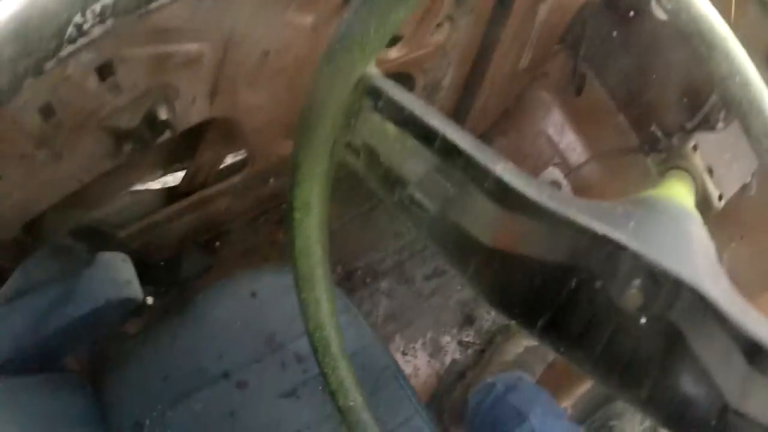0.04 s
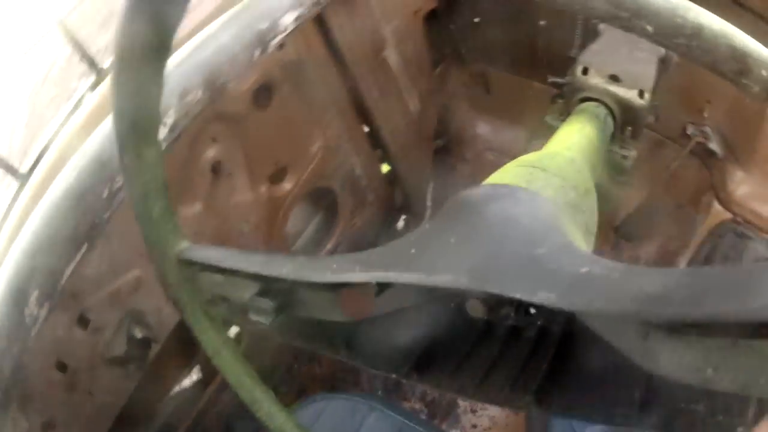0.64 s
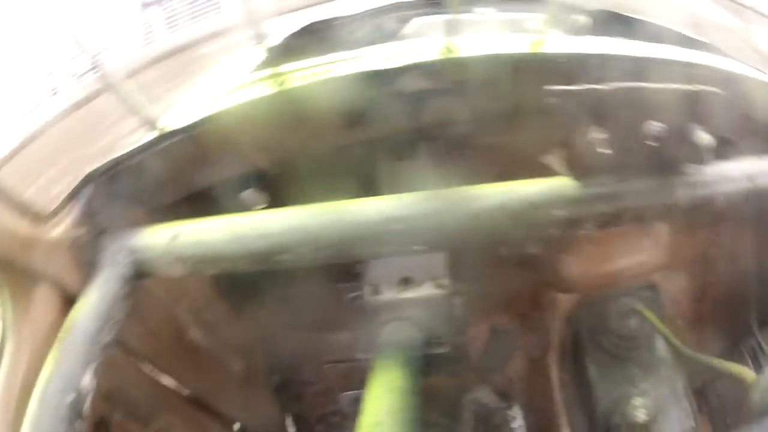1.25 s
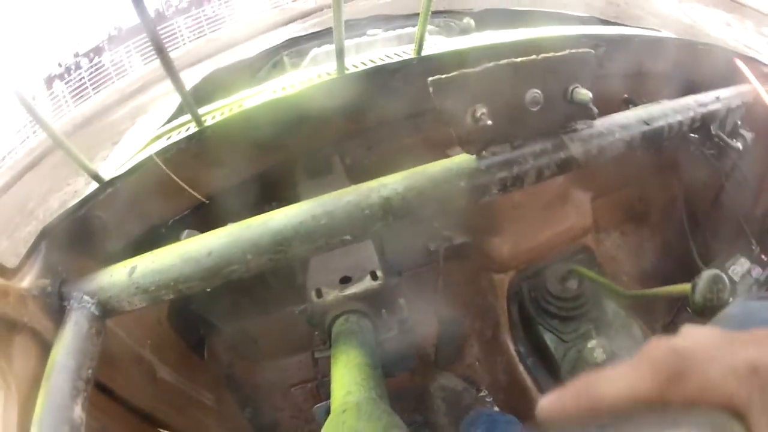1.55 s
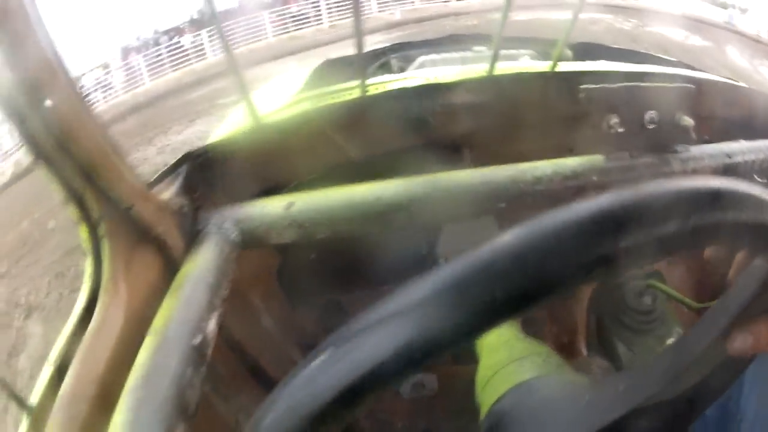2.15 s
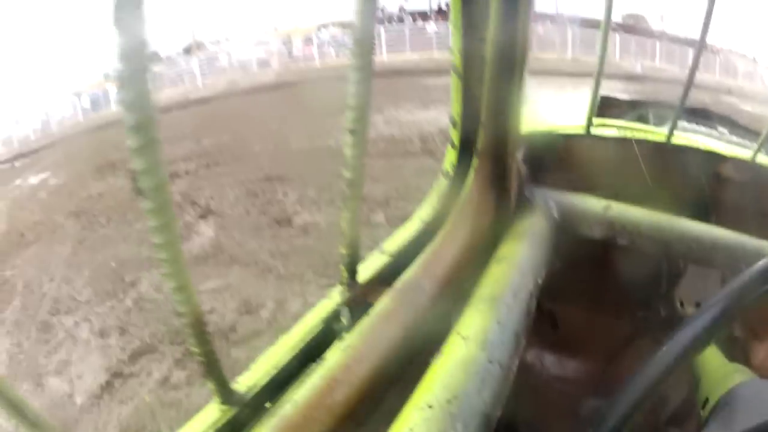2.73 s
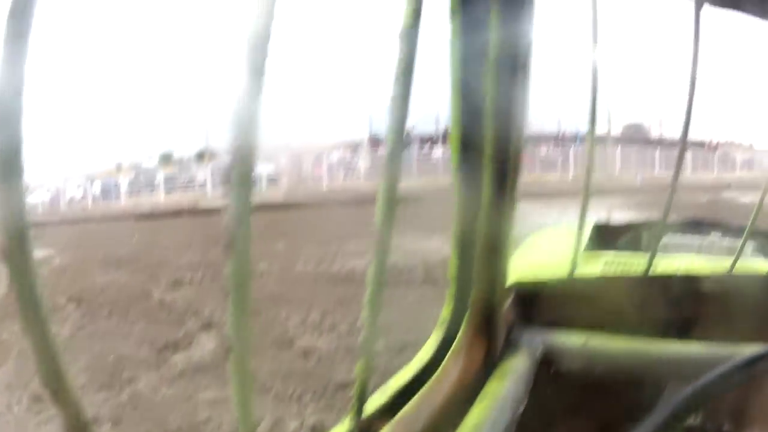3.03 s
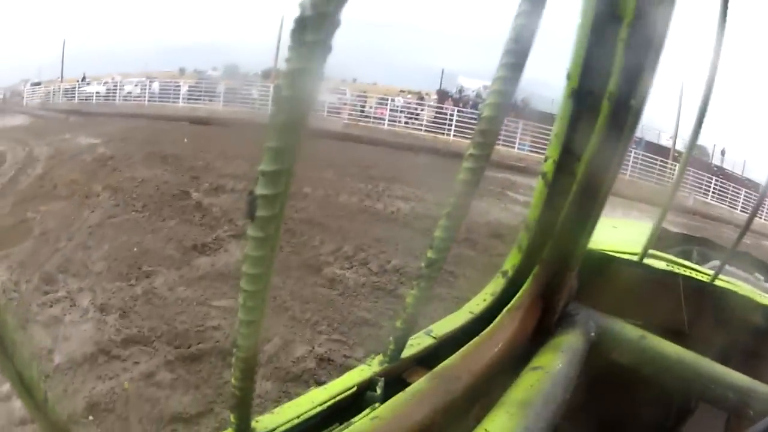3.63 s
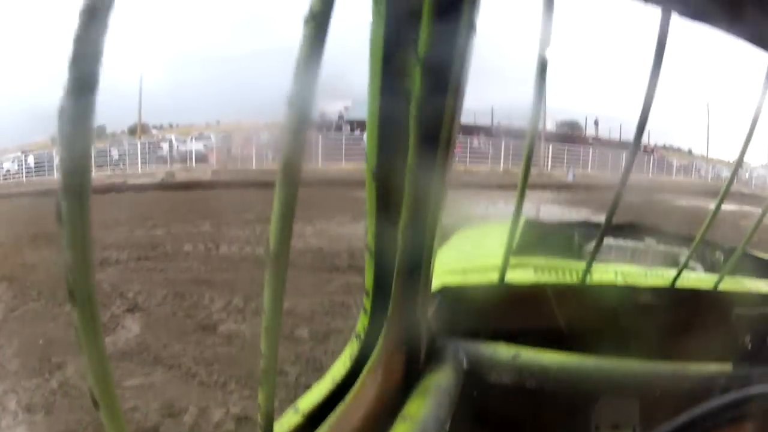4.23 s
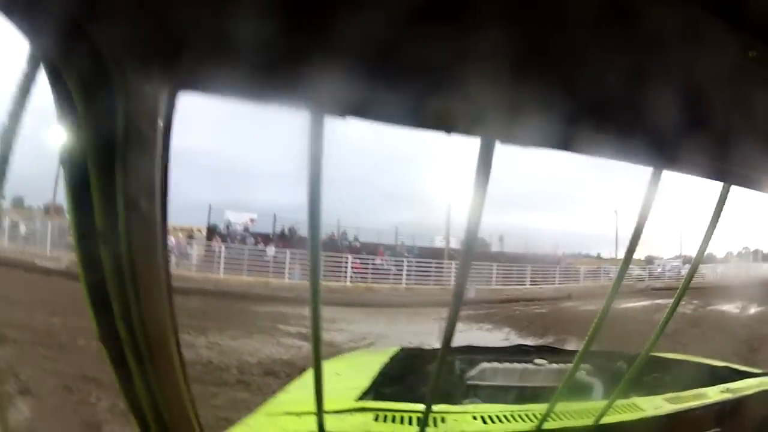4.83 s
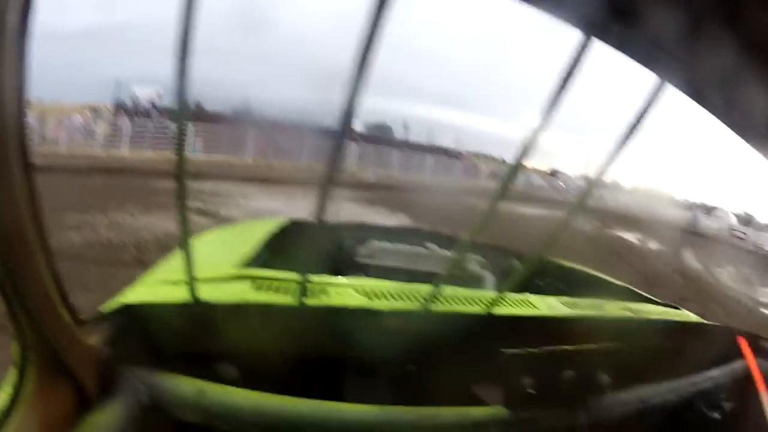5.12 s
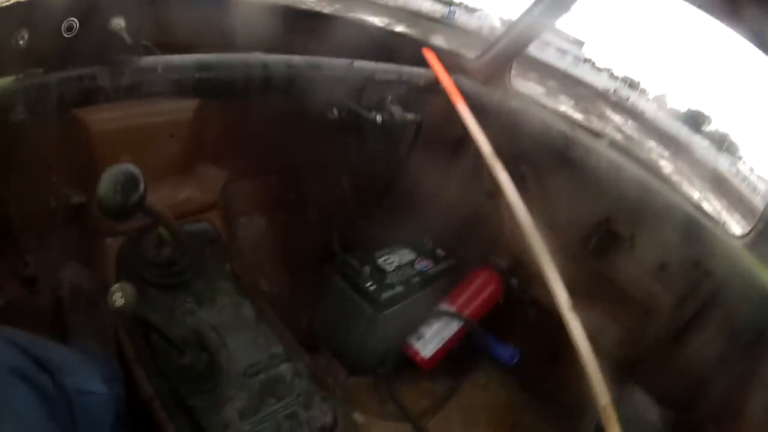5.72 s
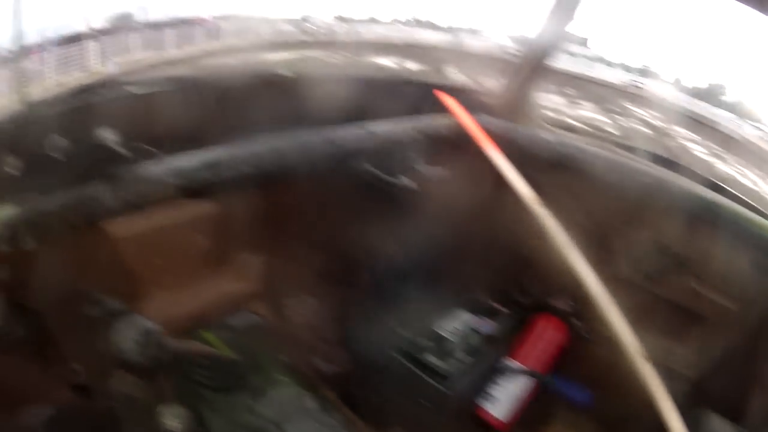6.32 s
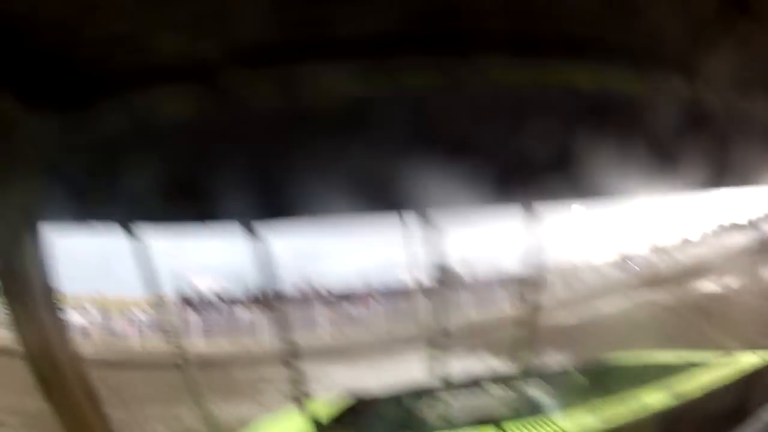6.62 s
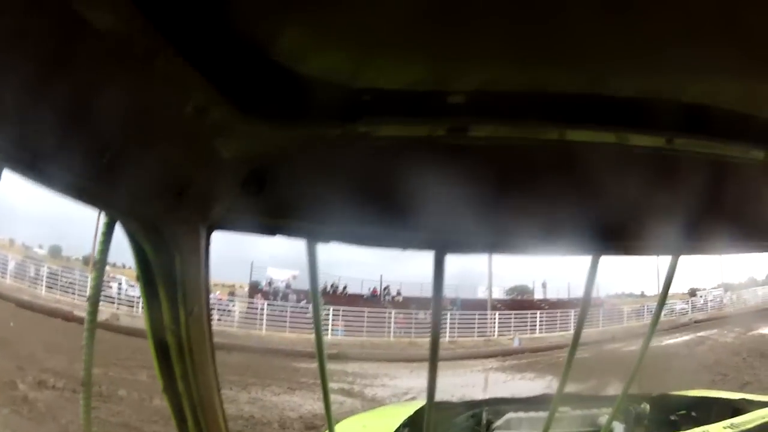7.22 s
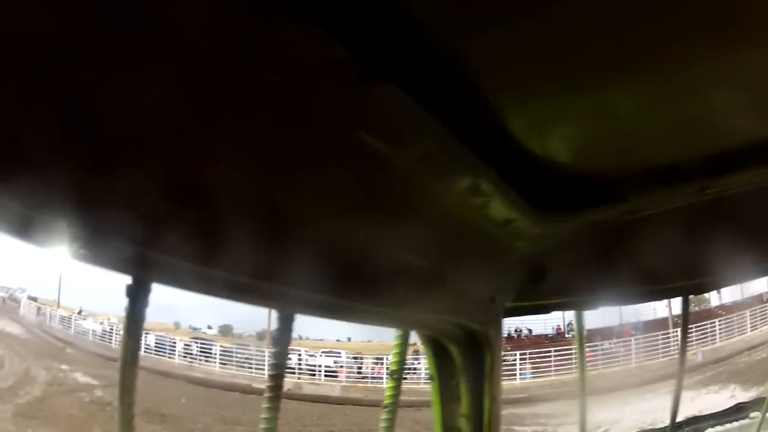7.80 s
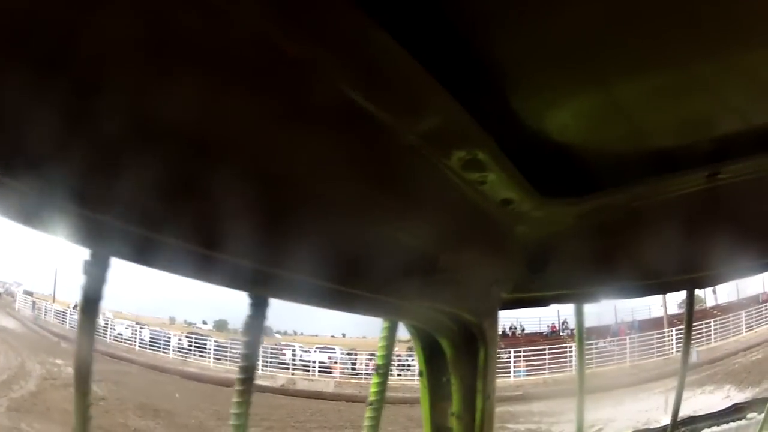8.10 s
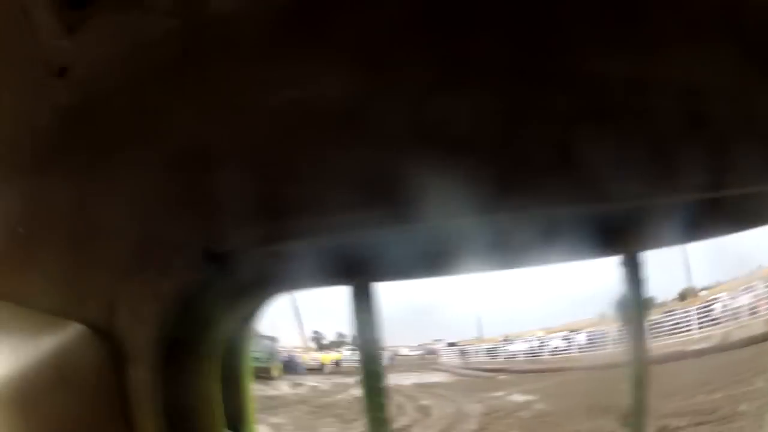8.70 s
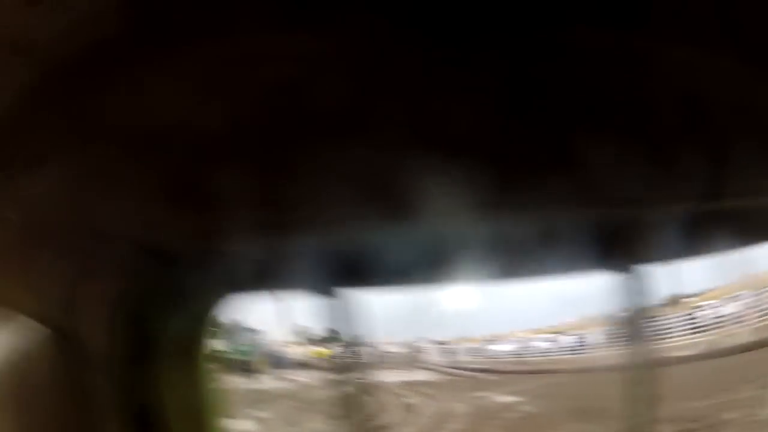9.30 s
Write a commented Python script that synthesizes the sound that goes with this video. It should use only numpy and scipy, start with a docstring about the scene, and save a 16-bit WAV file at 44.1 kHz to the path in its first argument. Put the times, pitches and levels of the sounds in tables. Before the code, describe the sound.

Inside a stripped truck cab in an outdoor arena, an engine idles faintly under low rumble and even hiss. A worn camera case hits the cab with a loud, sharp knock, followed by soft bumps, clothing scuffs and a brief strap creak. Later it knocks again with a deep boom and scrapes along the roof in short juddering bursts as the idle fades. A small buckle clinks near the end. Everything sounds boxy through the case.

```python
"""Stripped cab of a derby truck on a muddy arena, heard by a cased camera that the driver wears.
An engine idles some way off, under arena rumble and hiss. At 0.7 s the case knocks against the cab,
overloading; clothing scuffs as he turns. From 6.2 s the idle fades and a farther drone comes through.
At 6.8 s the case knocks again with a deep boom, then grinds along the roof. A buckle chafes at 9.1 s.
The camera samples coarsely, so its treble is a faint mirror image of the sound below."""
import sys
import numpy as np
from scipy import signal
from scipy.fft import rfft, irfft, next_fast_len
from scipy.io import wavfile
from scipy.ndimage import map_coordinates

SR = 44100
rng = np.random.default_rng(int(sys.argv[2]) if len(sys.argv) > 2 else 0)


def master(y):
    """Save y as 16-bit WAV."""
    cut = np.clip(np.atleast_2d(y).T, -1, 1)
    pcm = np.round(cut * 32767)  # scale
    wavfile.write(sys.argv[1], SR, pcm.astype(np.int16))


N = 412335

# rumble of arena and body sway: (frequency [Hz], density [dB])
RUMBLE_SPECTRUM = [(12, -23), (22, -8), (34, 5), (48, -21.5), (80, -13), (140, -15), (200, -15.5),
                   (300, -21.5), (450, -25), (700, -38.5), (1500, -63)]


def knocks():
    """The case strikes the cab, twice hard, otherwise softly."""
    # (time [s], shell [dB], contact cut-off [Hz], cab boom [dB], crack [dB])
    strikes = [(0.7118, 6.5, 5800, -36, -14), (1.801, -63, 150, -33.5, -70), (2.389, -21, 147, -25, -68),
               (3.132, -29, 150, -30.5, -69), (6.733, -31, 300, -24.5, -48), (6.76, -30.5, 300, -24.5, -48),
               (6.789, 3.5, 155, -4.5, -18.5), (6.981, -16, 150, -19, -56), (6.994, -42, 400, -47, -47),
               (7.035, -45, 150, -19.5, -67), (7.488, -37, 200, -26, -56)]
    out = np.zeros(N)
    for s, *strike in strikes:
        add(out, s, blow(*strike))
    return out


def blow(shell_db, cut_hz, boom_db, crack_db):
    """A blow cracks, rings the shell and booms the cab; soft contact builds slowly, missing high modes."""
    # case and mount: (frequency [Hz], level [dB], t60 [s])
    modes = [(84, -27, 0.31), (117.9, -14, 0.16), (201.4, 16, 0.0149), (213, -15.5, 0.032),
             (259.4, -19, 0.1), (331, 27.5, 0.00631), (406, -30, 0.072), (547.6, 27.5, 0.0046),
             (788, -40, 0.0184), (2208, -3, 0.015)]
    boom_hz, boom_t60_s, boom_attack_s = 47.3, 0.22, 0.0018
    choke_s, crack_peak_s = 0.061, 0.0021
    t = np.arange(SR // 2) / SR
    ring = sum(amp(db - 60 * t / t60) * np.sin(2 * np.pi * hz * t) / np.hypot(1, (hz / cut_hz) ** 2)
               for hz, db, t60 in modes)
    choke = np.exp(-(t / choke_s) ** 6)  # the case stays pressed on
    shell = ring * (1 - np.exp(-1.5 * t * cut_hz)) ** 2 * choke
    boom = amp(-60 * t / boom_t60_s) * np.sin(2 * np.pi * boom_hz * t)
    boom *= (1 - np.exp(-t / boom_attack_s)) ** 2
    burst = lambda u: (np.maximum(u, 0) * np.exp(1 - np.maximum(u, 0))) ** 1.1
    rebounds_s = np.cumsum(0.015 * 0.6 ** np.arange(3))
    chatter = sum(amp(-22.5 - 6 * k) * burst((t - s) / crack_peak_s) for k, s in enumerate(rebounds_s))
    crack = (burst(t / crack_peak_s) + chatter) * grains(contact_db, len(t))
    return amp(shell_db) * shell - amp(boom_db) * boom + amp(crack_db) * crack


def grinding():
    """The case lands softly, drags over gritty steel and judders on its mount."""
    # (start [s], length [s], grit [dB], judder [dB], landing [dB])
    drags = [(2.229, 0.028, -31, -56, -54), (6.866, 0.098, -29.5, -25.5, -35),
             (7.114, 0.065, -40, -34.5, -38), (7.185, 0.069, -48.5, -41.5, -48),
             (7.32, 0.046, -42, -37.5, -38), (7.424, 0.044, -38.5, -30, -47),
             (7.592, 0.04, -48, -36, -36.5)]
    # mount judder: (frequency [Hz], density [dB])
    judder_spectrum = [(20, 4), (45, 7.5), (110, 1), (160, -2.5), (220, 6), (330, -13.5), (435, -11.5),
                       (560, -28), (800, -40)]
    judder = lambda hz: along(judder_spectrum, hz)
    out = np.zeros(N)
    for s, length_s, grit_db, judder_db, landing_db in drags:
        add(out, s, amp(landing_db) * blow(shell_db=5, cut_hz=270, boom_db=8.5, crack_db=-2.5))
        mid_s, spread_s = s + length_s / 2, 0.35 * length_s
        add_stroke(out, mid_s, spread_s, spread_s, grit_db, contact_db, clump_db=0.9, square=4.35)
        add_stroke(out, mid_s, 0.73 * spread_s, 1.25 * spread_s, judder_db, judder,
                   clump_db=1.3, square=1.7)
    return out


def clothing():
    """Cloth slides, a taut strap rasps in a few resonances, body sway rumbles with each move."""
    # (peak [s], rise [s], fall [s], level [dB], tilt [dB/octave])
    scuffs = [(0.352, 0.0018, 0.0076, -41, 5), (0.397, 0.014, 0.015, -42, 2),
              (0.505, 0.041, 0.019, -36.5, -1.5), (0.828, 0.023, 0.047, -36.5, -2),
              (1.462, 0.0017, 0.012, -42, -0.5), (1.499, 0.0034, 0.016, -44, -1),
              (2.234, 0.015, 0.017, -37, 0.5), (2.524, 0.0025, 0.017, -42, -1),
              (3.32, 0.034, 0.039, -55, 1.5), (4.881, 0.076, 0.058, -51.5, 0),
              (5.2, 0.0091, 0.037, -38.5, 2.2), (5.301, 0.0025, 0.0086, -35.5, -5),
              (5.587, 0.0077, 0.015, -39, -4), (5.994, 0.0077, 0.019, -48, 0), (8.32, 0.032, 0.033, -57, 0),
              (8.787, 0.0077, 0.018, -51.5, 0)]
    # cloth relative to open hiss: (frequency [Hz], gain [dB])
    cloth_eq = [(250, 3.5), (520, -7.5), (800, 6), (1050, -0.5), (1400, -1), (2300, 1.5), (3600, 7),
                (5600, 7.5)]
    # strap over a hollow edge: (peak [s], rise [s], fall [s], level [dB])
    creaks = [(5.45, 0.03, 0.034, -42), (5.515, 0.029, 0.04, -39.5), (5.993, 0.009, 0.023, -45)]
    # (centre [Hz], half-width [Hz], level [dB])
    strap_modes = [(1320, 220, 0.5), (2050, 69, 5.5), (2530, 230, -1.5), (3470, 300, -15.5)]
    sway_s, sway_db = 0.1, -12
    out = np.zeros(N)
    for s, rise_s, fall_s, db, tilt in scuffs:
        cloth = lambda hz: airborne_db(hz) + along(cloth_eq, hz) + tilt * np.log2(np.clip(hz, 300, 6000))
        add_stroke(out, s, rise_s, fall_s, db, cloth, clump_db=2.0, square=1.42)
    strap = lambda hz: 20 * np.log10(sum(amp(db) / (1 + ((hz - centre) / width) ** 2)
                                         for centre, width, db in strap_modes))
    for s, rise_s, fall_s, db in creaks:
        add_stroke(out, s, rise_s, fall_s, db, strap, clump_db=1.5, square=2.3)
    for s, _, _, db, *_ in scuffs + creaks:
        add_stroke(out, s, sway_s, sway_s, db + sway_db, rumble_db, clump_db=-0.5, square=2.0)
    return out


def taps():
    """The mount shifts in its play: a click and a short hollow note."""
    # (time [s], note [dB], click [dB])
    shifts = [(0.061, -34.5, -56), (2.917, -33.5, -46.5), (2.986, -37.5, -38), (5.101, -35, -54),
              (5.227, -33.5, -53), (5.574, -46, -47), (8.431, -46, -59), (9.069, -42.5, -66),
              (9.281, -34.5, -50.5)]
    note_hz, note_t60_s, click_t60_s = 265, 0.045, 0.039
    out, t = np.zeros(N), np.arange(SR // 5) / SR
    for s, note_db, click_db in shifts:
        note_env = amp(note_db + 4.5 - 60 * t / note_t60_s) * (1 - np.exp(-t / 0.0023))
        click_env = amp(click_db - 60 * t / click_t60_s) * (1 - np.exp(-t / 0.00035))
        add(out, s, note_env * np.sin(2 * np.pi * note_hz * t) + click_env * grains(contact_db, len(t)))
    return out


def buckle():
    """Steel chafes on steel and rattles the buckle's damped modes, differently at each touch."""
    # (peak [s], rise [s], fall [s], level [dB])
    touches = [(9.081, 0.0027, 0.0043, -54.5), (9.105, 0.004, 0.0069, -50.5),
               (9.271, 0.0045, 0.0077, -45.5), (9.301, 0.0052, 0.018, -43.5)]
    # (frequency [Hz], level [dB], t60 [s])
    modes = [(2460, 0.5, 0.026), (2750, -7, 0.024), (3130, -10, 0.027), (3710, -6.5, 0.052),
             (4000, -6, 0.028), (4730, -11.5, 0.043), (5080, -2.5, 0.024)]
    lead_s = 0.25
    out, t = np.zeros(N), np.arange(SR // 5) / SR
    for s, rise_s, fall_s, db in touches:
        chafe = np.zeros(SR // 2)
        add_stroke(chafe, lead_s, rise_s, fall_s, db, np.zeros_like, clump_db=3, square=2)
        ring = sum(amp(mode_db + rng.normal(0, 2.7) - 60 * t / t60)
                   * np.sin(2 * np.pi * (hz * rng.normal(1, 0.014) * t + rng.random()))
                   for hz, mode_db, t60 in modes)
        rattle = signal.fftconvolve(chafe, ring / np.linalg.norm(ring))[:len(chafe)]
        grit = signal.lfilter(*signal.butter(2, [2200, 9000], "band", fs=SR), chafe)
        add(out, s - lead_s, amp(0.5) * rattle + amp(1.4) * grit)
    return out


def rustle():
    """Jacket fibres catch and tick in flurries, fainter once the driver sits still."""
    catches = (rng.random(N) < 60 * amp(4 * wobble(3)) / SR) * rng.uniform(0.46, 1, N)  # about 60 /s
    t = np.arange(SR // 50) / SR
    ticks = signal.fftconvolve(catches, rng.standard_normal(len(t)) * amp(-60 * t / 0.074))[:N]
    stir_db = np.interp(clock(), [6.5, 7.7], [-64, -72])
    fibre = lambda hz: airborne_db(hz) + 2.2 * np.log2(np.clip(hz, 300, 5000))
    return amp(stir_db) * unit(coloured(ticks, fibre))


def engines():
    """A six-cylinder idle, three firings a turn, fades as a farther drone comes through."""
    # (time [s], firing rate [Hz])
    firing_rate = [(0, 168.6), (1.3, 170), (2.4, 165.8), (3.8, 170.8), (5, 169.6), (6.3, 171.9)]
    # idle throb: (crankshaft order, level [dB])
    throb_orders = [(1, 1), (2, -16.5), (4, -23), (7, -43)]
    # firing note: (crankshaft order, level [dB])
    note_orders = [(3, -1.5), (6, -13), (9, -14.5)]
    turns = np.cumsum(curve(firing_rate) * (1 + 0.0036 * wobble(11))) / SR / 3
    early = np.interp(clock(), [0, 3.4], [1, 0])
    throb_db = -52.5 + 2.5 * early - 20 * fade()
    note_db = -53 - 7 * early - 12 * fade()
    idle = np.zeros(N)
    for orders, level_db in (throb_orders, throb_db), (note_orders, note_db):
        for order, db in orders:
            gain = amp(level_db + db + 2.4 * wobble(9.8))
            idle += gain * np.sin(2 * np.pi * (order * turns + rng.random()))
    drone_db = -77 + 17 * fade() + 1.42 * wobble(14)
    drone_hz = 73.3 * (1 + 0.0119 * wobble(1.6))
    drone = amp(drone_db) * np.sin(2 * np.pi * np.cumsum(drone_hz) / SR)
    return np.sqrt(2) * (idle + drone)


def arena():
    """Low rumble and even hiss fill the open cab."""
    # (time [s], level [dB])
    hiss_level = [(0.0, -52.5), (0.28, -54), (0.91, -50), (1.48, -52.5), (3.38, -52.5), (3.7, -50.5),
                  (4.01, -53), (5.28, -50.5), (5.39, -49.5), (5.78, -50), (6.3, -49.5), (6.43, -52.5),
                  (7.08, -55.5), (9.35, -56)]
    rumble = amp(-50.5 - 2.5 * fade() + 0.88 * wobble(5.2)) * grains(rumble_db, N)
    hiss = amp(curve(hiss_level)) * grains(airborne_db, N, clump_db=1.0)
    return rumble + hiss


def contact_db(hz):
    """Spectrum of friction on the case itself."""
    # (frequency [Hz], density [dB])
    friction_spectrum = [(120, -18), (300, -7.5), (600, -5), (800, 4.6), (1020, -1), (1230, 1), (1800, 1.5),
                         (2500, -5.5), (3700, -7), (4700, -24), (6000, -17), (6500, -80)]
    return along(friction_spectrum, hz) + case_db(hz)


def airborne_db(hz):
    """Spectrum of broad hiss heard through the case."""
    # (frequency [Hz], density [dB])
    hiss_spectrum = [(250, -4), (500, -7), (750, -5), (950, -6), (1200, -3.5), (1500, -4.5), (2400, -2),
                     (3600, -7), (4400, -14.5), (5300, -10), (6000, -13), (6500, -78)]
    return along(hiss_spectrum, hz) + case_db(hz)


def case_db(hz):
    """Lift from air resonances in the case."""
    # (centre [Hz], width [Hz], lift [dB])
    resonances = [(1190, 237, 12), (1693, 357, 8), (2030, 250, 6), (2433, 106, 10), (2900, 120, 2.5),
                  (3596, 184, 4)]
    return sum(db / (1 + (2 * (hz - centre) / width) ** 2) for centre, width, db in resonances)


def rumble_db(hz):
    """Spectrum of the low rumble."""
    return along(RUMBLE_SPECTRUM, hz)


def fade():
    """Progress of the idle's fade, 0 to 1."""
    return np.interp(clock(), [6.2, 7.8], [0, 1])


def add_stroke(out, peak_s, rise_s, fall_s, db, spectrum, clump_db, square):
    """Mix in a sliding contact: friction grains swell and die away; square sets how abruptly."""
    t = np.arange(-SR // 4, SR // 4) / SR
    swell = np.exp(-.5 * np.abs(t / np.where(t < 0, rise_s, fall_s)) ** square)
    slips = map_coordinates(rng.standard_normal(160), [(t - t[0]) * 250])  # stick-slip, 4 ms knots
    add(out, peak_s + t[0], amp(db + 0.72 * clump_db * slips) * swell * grains(spectrum, len(t), clump_db))


def grains(spectrum, count, clump_db=0):
    """Coloured noise, rms 1; each millisecond catches with its own strength."""
    catch = np.repeat(rng.standard_normal(count // 44 + 1), 44)[:count]
    return unit(coloured(rng.standard_normal(count) * amp(clump_db * catch), spectrum))


def coloured(x, spectrum):
    """x shaped by spectrum(Hz) in dB."""
    size = next_fast_len(len(x) + 4096)
    return irfft(rfft(x, size) * amp(spectrum(np.fft.rfftfreq(size, 1 / SR))), size)[:len(x)]


def add(out, s, x):
    """Mix x into out from time s."""
    start = round(s * SR)
    x = x[max(-start, 0):N - start]
    out[max(start, 0):][:len(x)] += x


def wobble(rate_hz):
    """Smooth random curve, rate_hz knots a second."""
    return map_coordinates(rng.standard_normal(int(N * rate_hz / SR) + 4), [clock() * rate_hz])


def along(points, hz):
    """(Hz, value) points read on a log axis."""
    knots_hz, values = np.transpose(points)
    return np.interp(np.log(hz + 1), np.log(knots_hz + 1), values)


def curve(points):
    """(s, value) points read at every sample."""
    return np.interp(clock(), *np.transpose(points))


def clock():
    """Sample times, s."""
    return np.arange(N) / SR


def amp(db):
    """dB to gain."""
    return 10 ** (np.asarray(db) / 20)


def unit(x):
    """x at rms 1."""
    return x / np.sqrt(np.mean(x ** 2) + 1e-20)


def scene():
    """All sources at one microphone."""
    return (engines() + arena() + knocks() + taps() + clothing() + rustle() + buckle() + grinding())[None]


def record(dry):
    """The hardest knock clips; the converter keeps a narrow band and mirrors it about its sampling rate."""
    # converter band edge: (frequency [Hz], gain [dB])
    band_edge = [(4300, 0), (5300, -5.5), (6000, -17), (6200, -120)]
    mirror_hz, unity_hz, tilt_db_per_khz, top_hz = 12000, 10870, -0.84, 15500
    band = coloured(np.clip(dry[0], -1.1, 1.1), lambda hz: along(band_edge, hz))
    slope = np.gradient(band) * SR / (2 * np.pi * unity_hz)  # the image grows with pitch
    image = 2 * slope * np.cos(2 * np.pi * mirror_hz * clock())
    image = coloured(image, lambda hz: tilt_db_per_khz * (hz - mirror_hz) / 1000)
    clipped = np.clip(band + image, -1, 1)
    return coloured(clipped, lambda hz: np.where(hz < top_hz, 0, -120))[None]


dry = scene()
out = record(dry)
master(out)
```